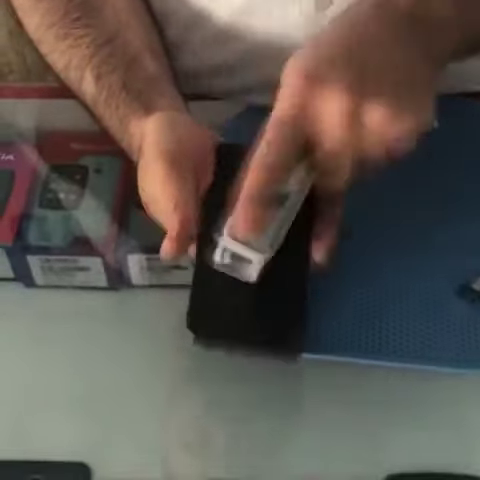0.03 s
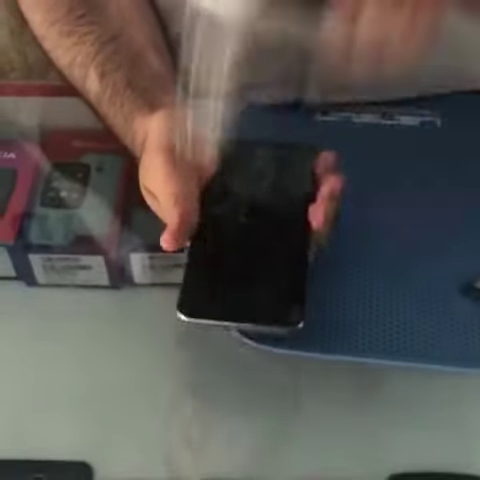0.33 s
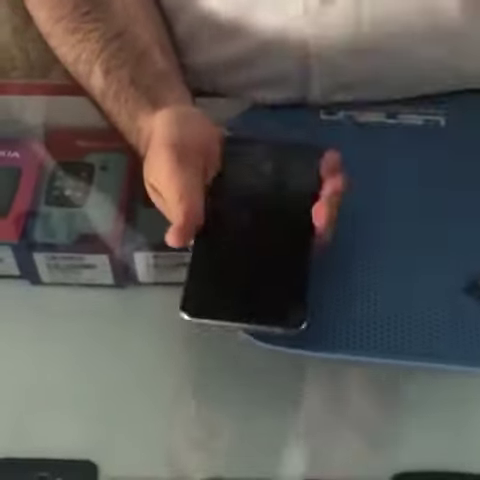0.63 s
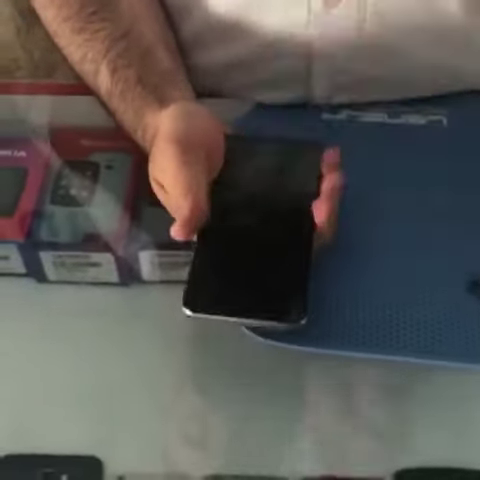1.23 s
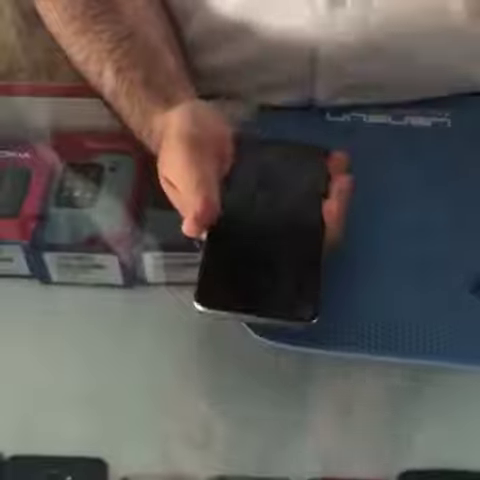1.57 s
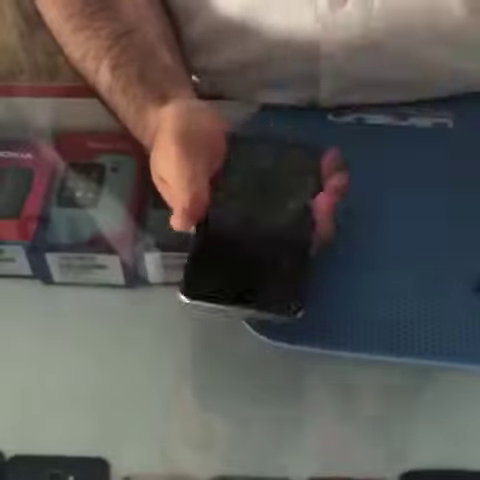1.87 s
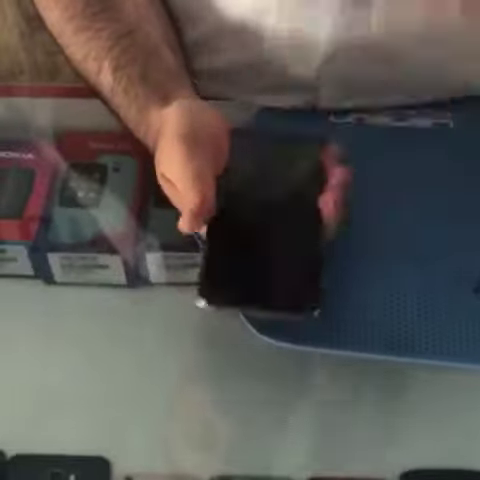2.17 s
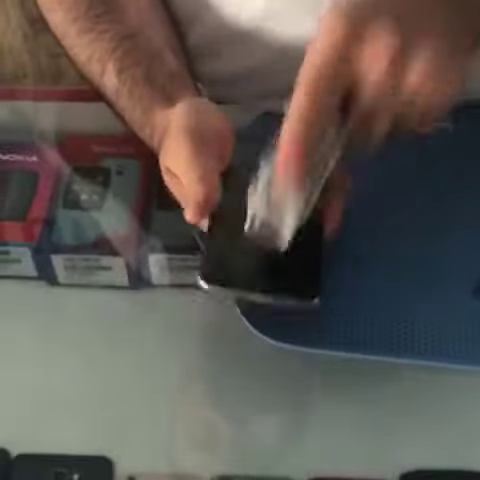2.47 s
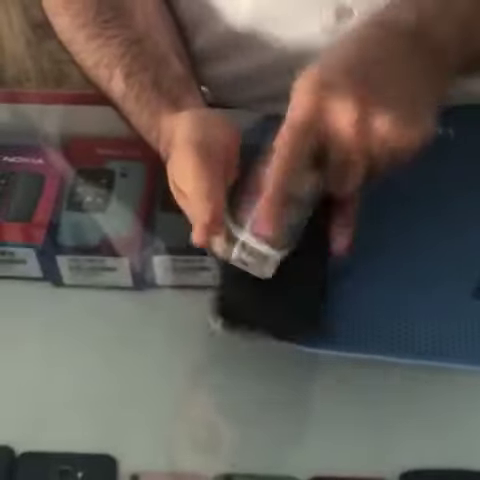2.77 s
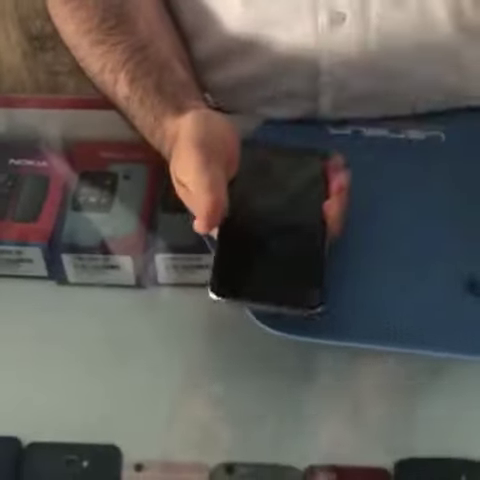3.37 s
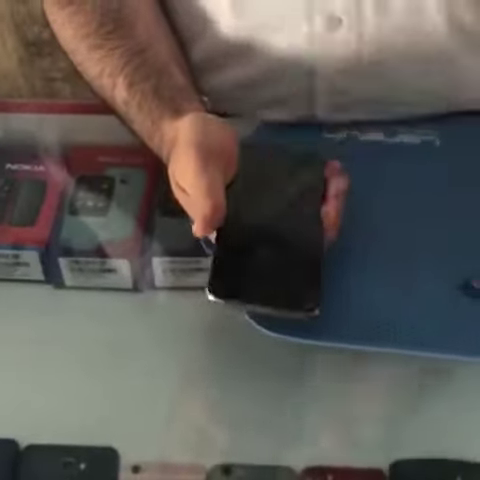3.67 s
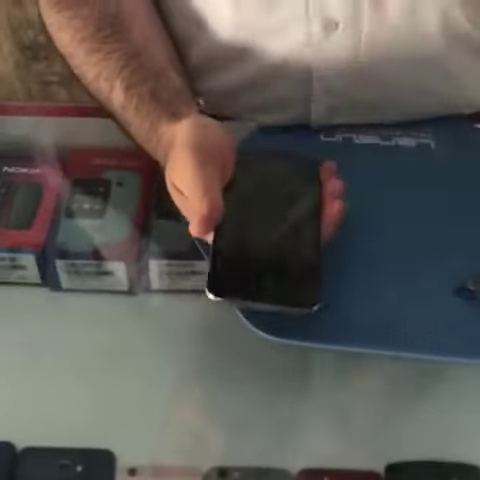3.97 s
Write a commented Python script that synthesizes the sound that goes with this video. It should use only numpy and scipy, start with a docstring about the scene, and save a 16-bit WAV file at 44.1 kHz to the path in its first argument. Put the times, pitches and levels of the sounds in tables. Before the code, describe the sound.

A hard object repeatedly cracks against phone glass, each tap thumping the desk beneath.

```python
"""A quiet shop, one microphone close to a desk where a phone is held on a mat.
A small hard object is knocked on the screen about three times a second. Each tap is a bright crack
with a short chatter and a glassy ring; a moment later the phone is driven into the desk, which
knocks and booms. A faint ticking comes just ahead of every tap. Farther off, the small room
answers over its own low, steady noise."""
import sys
import numpy as np
from scipy import signal
from scipy.io import wavfile

SR = 44100
rng = np.random.default_rng(int(sys.argv[2]) if len(sys.argv) > 2 else 0)


def transcribe(u):
    """Save the signal u as a 16-bit wav file named by the first command-line argument.

    u: samples, shape (n,) or (channels, n), limited to [-1, 1]; the rate is SR.
    q: integer samples, one column per channel.
    """
    v = np.clip(np.atleast_2d(u).T, -1, 1)
    q = np.round(v * 32767).astype(np.int16)
    wavfile.write(sys.argv[1], SR, q)


N = 176400
T = np.arange(SR) / SR  # the one second in which a blow dies away


def amp(db):
    """Decibels to gain."""
    return 10 ** (np.asarray(db) / 20)


def value_at(points, hz):
    """Interpolates a table on a log-frequency axis."""
    freqs, values = np.transpose(points)
    return np.interp(np.log(hz + 1), np.log(freqs), values)


def unit(x):
    """Scales a sound to an energy of one."""
    return x / np.sqrt(np.sum(x ** 2) + 1e-20)


def add(mix, start_s, sound):
    """Mixes a sound in, cutting what falls outside the mix."""
    at = round(start_s * SR)
    sound = sound[max(-at, 0):]
    part = mix[max(at, 0):][:len(sound)]
    part += sound[:len(part)]


def colour(x, points, size=4096):
    """Minimum-phase filter with the spectrum (frequency [Hz], level [dB])."""
    hz = abs(np.fft.fftfreq(size, 1 / SR))
    log_gain = np.log(amp(value_at(points, hz)))
    impulse = np.fft.ifft(np.exp(np.conj(signal.hilbert(log_gain)))).real
    return signal.fftconvolve(x, impulse[:size // 2])[:len(x)]


def highpass(x, hz):
    """Gentle, first-order high-pass."""
    return signal.lfilter(*signal.butter(1, hz, "high", fs=SR), x)


def ring(modes, spread_db=0, detune=0):
    """Struck modes: dying sines, with optional scatter in level and pitch."""
    chance = rng.standard_normal((len(modes), 2))
    out = np.zeros(len(T))
    for (hz, db, t60), (louder, sharper) in zip(modes, chance):
        envelope = amp(db + spread_db * louder - 60 * T / t60)
        out += envelope * np.sin(2 * np.pi * hz * (1 + detune * sharper) * T)
    return out


def burst(envelope):
    """A rough contact: noise of unit energy under an envelope."""
    return unit(envelope * rng.standard_normal(len(envelope)))


# Room tone all around the microphone: (frequency [Hz], relative level [dB])
AIR_COLOUR = [(25, 6), (60, 12.5), (130, 3), (300, -11.5), (600, -12.5), (1600, -14.5), (4000, -19),
              (7000, -26), (11500, -44)]


def shop_air(rms_db=-49):
    """The still air of the shop: low, steady noise."""
    return amp(rms_db) * np.sqrt(N) * unit(colour(rng.standard_normal(N), AIR_COLOUR))


# Decay of the small room: (frequency [Hz], t60 [s])
ROOM_DECAY = [(150, .5), (500, 0.2878), (1600, 0.2925), (3500, 0.3228), (7000, 0.2931), (11500, 0.2142)]
# Colour of the sound coming back from the walls: (frequency [Hz], level [dB])
WALL_COLOUR = [(60, -1.5), (150, 0), (340, 1.5), (500, -5), (800, 1), (1500, 1), (2600, 0.5), (4800, -6.5),
               (6400, -4.5), (7150, -3.5), (7700, -7.5), (11000, -8.5), (12500, -13)]


def room_answer(walls, change_rad=0.8, late_db=-32, late_t60_s=1.12):
    """Dense reflections, partly the same at each tap, every band dying at its own speed."""
    paths = np.cos(change_rad) * walls + np.sin(change_rad) * rng.standard_normal(len(T))
    hz, t, bands = signal.stft(paths, SR, nperseg=256)
    early = amp(-60 * t / value_at(ROOM_DECAY, hz)[:, None])
    late = amp(late_db - 60 * t / late_t60_s)
    reflections = signal.istft(bands * (early + late), SR)[1]
    return amp(16) * colour(unit(reflections), WALL_COLOUR)


def tick(fade_s=0.0041):
    """A tiny dry tick: the colour of the crack, thinned in the bass."""
    return highpass(crack_colour(burst(np.exp(-T / fade_s))), hz=1500)


# Stray ticks near the microphone: (time [s], level [dB])
FINGER_TICKS = [(1.072, -37), (1.7368, -31.5), (2.09, -38)]


def add_finger_ticks(mix):
    """The object ticks in the fingers between taps."""
    for start_s, db in FINGER_TICKS:
        add(mix, start_s, amp(db) * tick())


# Ticks ahead of each tap: (time before the tap [s], level relative to the crack [dB])
LEAD_TICKS = [(.0235, -28.5), (.011, -30)]


def add_lead_ticks(mix, tap_s, crack_db):
    """A faint pair of ticks comes just before the object lands."""
    for lead_s, db in LEAD_TICKS:
        add(mix, tap_s - lead_s, amp(crack_db + db) * tick())


# Low modes of the desk under the mat: (frequency [Hz], level [dB], t60 [s])
DESK_MODES = [(54, -14, 0.15), (56.07, -16, 1.28), (73.47, -4.5, 0.36), (81.5, 0.5, 0.12),
              (111.3, -11.5, 0.2), (187.4, -17, 0.23), (235.8, -31, 0.3), (326.4, -18, 0.17)]


def desk_boom(rise_s=0.0035):
    """The desk top swings in its low modes."""
    return amp(-8.5) * ring(DESK_MODES) * (1 - np.exp(-T / rise_s))


# Colour of the knock on the desk, heard close: (frequency [Hz], level [dB])
KNOCK_COLOUR = [(60, -19), (130, -6.5), (340, 4.5), (490, -0.5), (640, 2.5), (900, 3), (1500, -2),
                (3400, -2.5), (4800, -18), (11500, -25.5)]
KNOCK_RISE_S, KNOCK_FADE_S = 0.003, 0.01


def desk_knock():
    """The phone is pressed through the mat against the desk: a duller, softer blow."""
    rise = np.minimum(T / KNOCK_RISE_S, 1)
    fade = np.exp(-np.maximum(T - KNOCK_RISE_S, 0) / KNOCK_FADE_S)
    return amp(17) * colour(burst(rise * fade), KNOCK_COLOUR)


# Long, glassy modes after a tap: (frequency [Hz], level [dB], t60 [s])
GLASSY_MODES = [(1395, -6.5, 0.61), (1470, 0.5, 0.39), (1533, -2.5, 0.47), (1573, 1.5, 0.45),
                (1647, 3.5, 0.4), (1630, -19, 0.92), (1670, -0.5, .35), (1810, -10, 0.57)]


def glassy_ring(flutter_depth=1.27, flutter_hz=45, scatter_s=0.00299, strike_s=0.007):
    """Close, wavering modes that start slightly apart: strong at the strike, then lingering."""
    cluster = np.zeros(len(T))
    for mode in GLASSY_MODES:
        flutter = signal.lfilter(*signal.butter(2, flutter_hz, fs=SR), rng.standard_normal(len(T)))
        waver = (1 + flutter_depth * unit(flutter) * np.sqrt(len(T))) / np.hypot(1, flutter_depth)
        add(cluster, scatter_s * rng.random(), waver * ring([mode], detune=0.00285))
    strike = 1 + amp(12.5) * np.exp(-T / strike_s)
    return amp(-30.5) * cluster * strike


def glass_spot(x, spread_db=2, step_hz=140.8, count=100):
    """Each spot on the glass colours the blow with its own random peaks and dips."""
    hz = np.arange(1, count + 1) * step_hz
    db = spread_db * np.sqrt(3) * rng.uniform(-1.1, 1, count)
    db *= np.minimum(hz / 2000, 1)  # shallower in the bass
    return colour(x, np.column_stack([hz, db]))


# Colour of the crack, close to the screen: (frequency [Hz], level [dB])
CRACK_COLOUR = [(100, 3.5), (300, -15.5), (500, -7.5), (850, -3), (1080, -0.5), (1600, 0), (3000, 1),
                (4800, -5), (7000, -2), (11500, -6.5)]


def crack_colour(contact):
    """Gives a contact the bright sound of a hard object on glass."""
    return amp(17) * colour(contact, CRACK_COLOUR)


# Contacts of the object on the glass: (time after the tap [s], level [dB], fade time [s])
CHATTER = [(0, -4.5, 0.00081), (.001, -1.5, 0.0011), (.0028, -4, 0.0013), (.005, 0, 0.0021),
           (0.0099, -13.5, 0.0031)]
# Short modes of phone and object: (frequency [Hz], level [dB], t60 [s])
BODY_MODES = [(892, -6.5, 0.029), (1480, -9.5, 0.09), (1610, -11, 0.069), (2120, -8.5, .04),
              (2880, 2, .045), (3460, -6.5, 0.017), (7100, -9.5, .08), (8480, -6.5, 0.053)]


def screen_crack(body_db, timing_jitter=0.12):
    """The object hits the glass, chatters, and rings the phone's body."""
    hits = np.zeros(len(T))
    for after_s, db, fade_s in CHATTER:
        later, _ = rng.standard_normal(2)
        add(hits, after_s * (1 + timing_jitter * later), amp(db) * burst(np.exp(-T / fade_s)))
    body = amp(body_db - 16.5) * ring(BODY_MODES, spread_db=2, detune=0.0019)
    return crack_colour(unit(hits)) + body


# Taps on the screen, in the foreground; levels are trims on each source: (time [s], crack [dB],
# treble [dB], body ring [dB], knock [dB], boom [dB], delay to the desk [s], glassy ring [dB])
SCREEN_TAPS = [(-.25, -3, 6, 12, -2, -3, 0.012, -16), (.0946, 0.5, -2.5, -10, 1, -1, 0.018, -4.5),
               (0.439, -1.5, 0, -3, -2.5, -5, 0.018, -1), (0.7876, -2, 0, 4, -1.5, -3.5, 0.018, -3),
               (1.119, -2.5, 1.5, -3, -4, -8.5, 0.021, -8.5), (1.4439, -1, 2, -7, -1.5, -3.5, 0.018, -15),
               (1.7866, -2.5, 3, -1.5, -3, -2.5, 0.016, -6.5), (2.1371, -0.5, 0, -2.5, 0, 0, 0.016, -8.5),
               (2.4807, -2, -0.5, 0.5, 0.5, -0.5, .016, -6), (2.8338, -0.5, 0.5, 1, 2, 1.5, 0.013, -31),
               (3.1814, -0.5, -1, -3.5, 1.5, 0.5, 0.015, -8), (3.539, -1.5, 0, -7, -0.5, -0.5, .014, -7),
               (3.8978, 0, -0.5, -1.5, 0.5, 0.5, 0.012, -29)]


def scene():
    """Every tap with its knock, boom and room answer, over the air of the shop, in mono."""
    mix = shop_air()
    walls = rng.standard_normal(len(T))  # the reflections that all taps share
    for tap_s, crack_db, treble_db, body_db, knock_db, boom_db, delay_s, ring_db in SCREEN_TAPS:
        blow = amp(crack_db) * screen_crack(body_db)
        add(blow, delay_s - KNOCK_RISE_S / 2, amp(knock_db) * desk_knock())
        add(blow, 0.009, amp((crack_db + knock_db) / 2) * room_answer(walls))
        blow += (amp(treble_db) - 1) * highpass(blow, hz=4530)  # treble shelf
        add(mix, tap_s, glass_spot(blow))
        add(mix, tap_s + 0.00202, amp(ring_db) * glassy_ring())
        add(mix, tap_s + delay_s + 0.0009, amp(boom_db) * desk_boom())  # swings just after the knock
        add_lead_ticks(mix, tap_s, crack_db)
    add_finger_ticks(mix)
    return mix[None]


def record(dry, low_cut_hz=39, ceiling_db=1, top_hz=12050):
    """The recorder drops the deepest bass, rounds off the peaks and limits the band."""
    trimmed = signal.lfilter(*signal.butter(2, low_cut_hz, "high", fs=SR), dry)
    rounded = amp(ceiling_db) * np.tanh(trimmed / amp(ceiling_db))
    band_limit = signal.firwin(121, top_hz, window=("kaiser", 8), fs=SR)
    return signal.oaconvolve(rounded, band_limit[None], "same")


dry = scene()
out = record(dry)
transcribe(out)
```